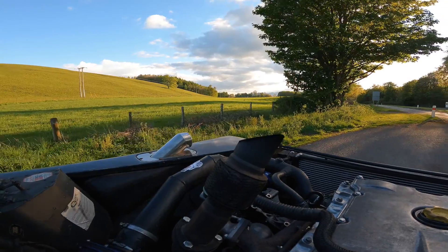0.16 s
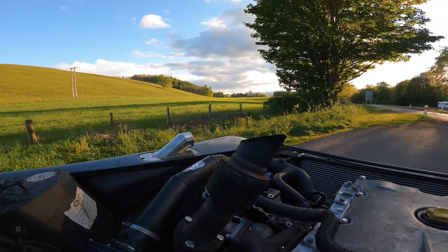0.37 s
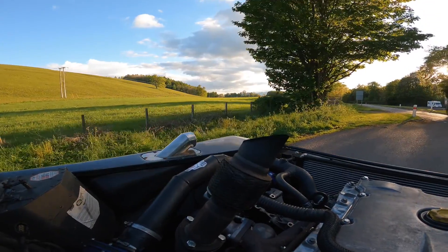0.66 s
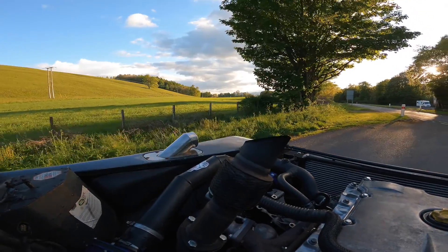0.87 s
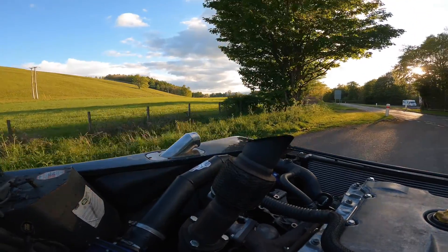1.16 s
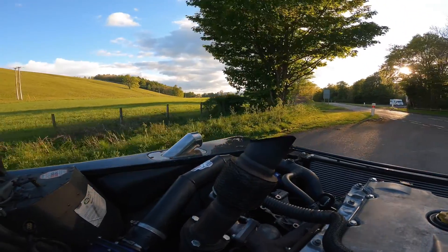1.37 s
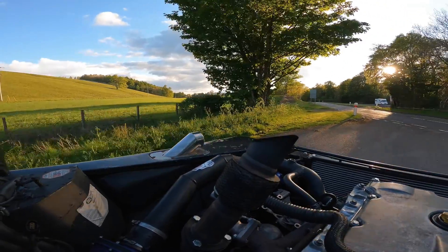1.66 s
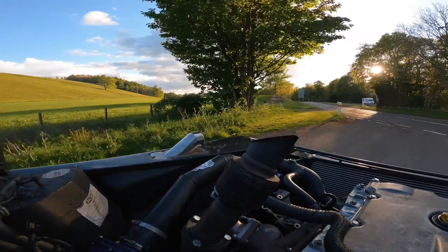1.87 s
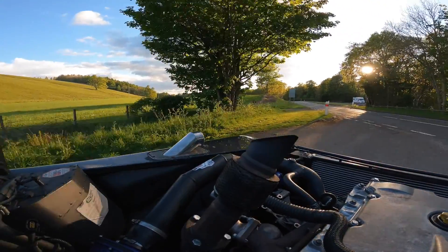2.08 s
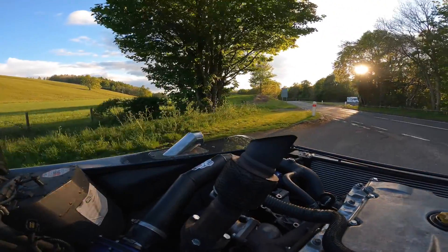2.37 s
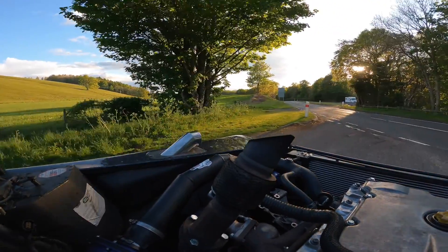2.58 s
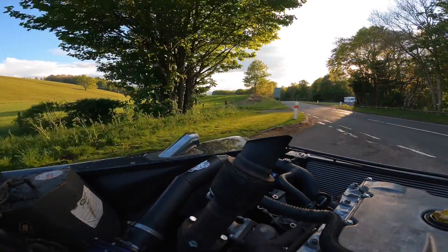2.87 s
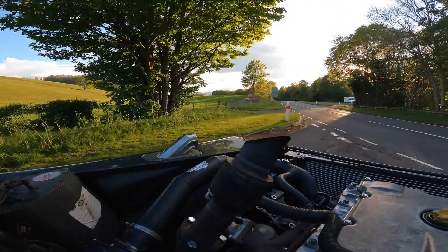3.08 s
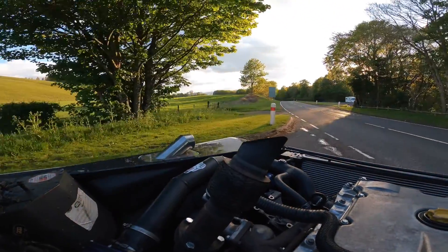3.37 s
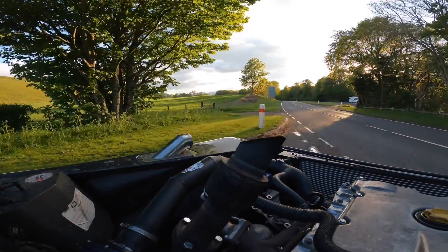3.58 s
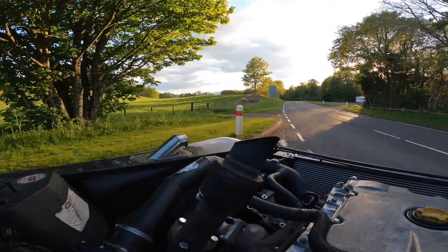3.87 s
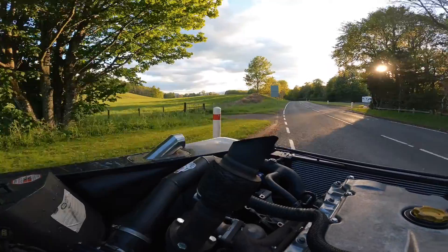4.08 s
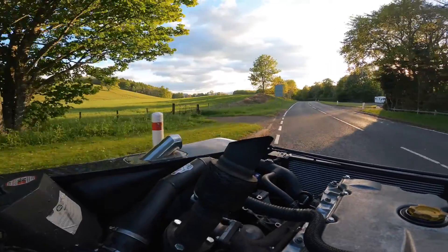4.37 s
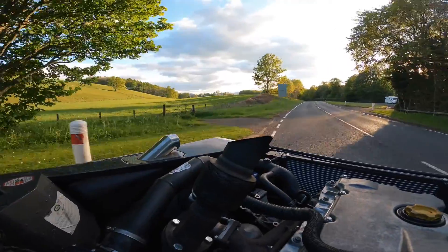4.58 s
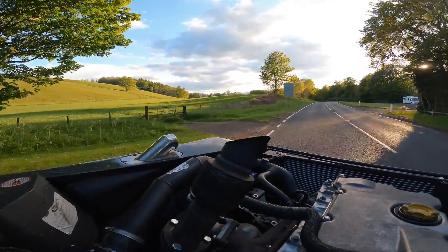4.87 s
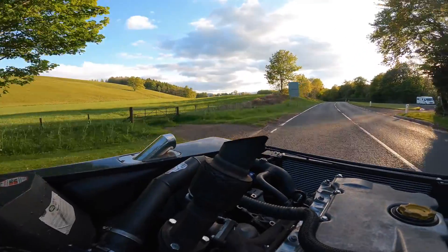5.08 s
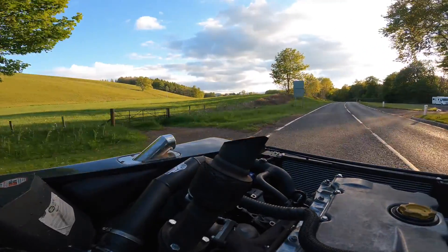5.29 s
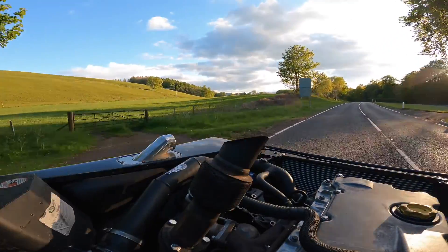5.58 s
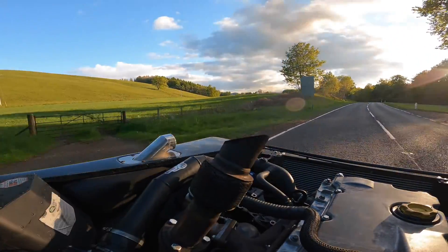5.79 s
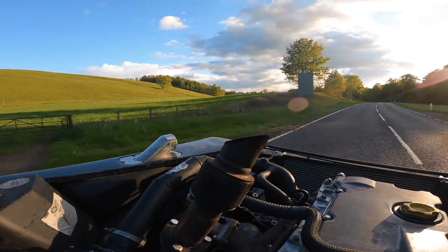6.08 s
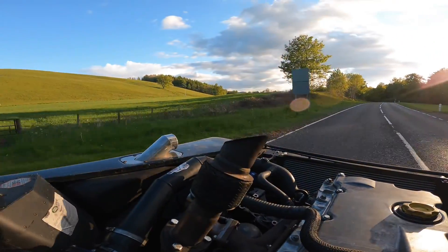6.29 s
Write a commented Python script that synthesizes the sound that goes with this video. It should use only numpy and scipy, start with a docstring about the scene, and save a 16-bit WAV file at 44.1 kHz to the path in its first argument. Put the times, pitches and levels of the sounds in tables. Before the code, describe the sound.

Heard over an open engine bay, a knocking diesel pulls away and climbs to high revs, intake roaring, turbo whistling, wind buffeting, then lifts off.

```python
"""Turbodiesel revving up to a lift-off

A five-cylinder turbodiesel pulls away from idle and revs up until the throttle shuts, heard over the open engine bay.
The intake booms and roars on multiples of the firing rate; each firing knocks the block and puffs hiss and ticking.
The turbo whistle, a tone bent and chopped by the pulses, climbs with boost and drops as the throttle shuts.
Wind, as filtered noise, buffets the two microphone ports more strongly as speed builds."""
import sys
import numpy as np
from scipy import signal
from scipy.fft import rfft, irfft
from scipy.io import wavfile
from scipy.ndimage import uniform_filter1d

SR = 44100
rng = np.random.default_rng(int(sys.argv[2]) if len(sys.argv) > 2 else 0)


def voltage_ratio(level):
    """Linear amplitude factor for a level in decibels (scalar or array-like)."""
    return 10 ** (np.asarray(level, float) / 20)


def store_pcm(level_fs):
    """Save levels as 16-bit WAV."""
    pcm = np.round(np.clip(level_fs, -1, 1) * 32767).astype(np.int16)
    wavfile.write(sys.argv[1], SR, np.atleast_2d(pcm).T)


N = 284445
T = np.arange(N) / SR

# Engine speed. Each row: time in seconds, firing rate in Hz.
FIRING_RATE = [(0.0, 38.72), (0.07, 38.11), (0.85, 37.16), (0.94, 39.98), (1.1, 43.23), (1.25, 43.79),
               (1.33, 46.05), (2.23, 66.13), (2.48, 71.01), (2.91, 78.32), (3.67, 89.72), (4.25, 101.08),
               (5.04, 117.95), (5.25, 124.31), (5.46, 128.1), (5.67, 136.19), (6.24, 155.3), (6.28, 151.41),
               (6.45, 147.58)]
# Intake pipe's answer to engine speed. Each row: firing rate in Hz, then the rms level in dB of the
# first, second and third multiple with the throttle open.
INTAKE_BOOM = [(36.8, -28, -15, -33), (43, -24, -14, -26), (50.6, -21.5, -14, -21.5),
               (57.7, -16, -16.5, -23), (64.4, -13, -21.5, -21), (68.5, -13, -25, -22),
               (75.9, -12, -21.5, -25), (81.3, -12.5, -19.5, -31), (97.86, -12, -16.5, -27.5),
               (113, -11, -20, -28.5), (129.4, -10, -23, -37), (156, -12, -21.5, -36)]
# Intake pipe as seen by upper multiples and uneven cylinders. Each row: frequency in Hz, gain in dB.
INTAKE_PIPE = [(40, -73), (100, -28.5), (150, -33), (190, -17.5), (225, -26), (265, -31), (310, -35),
               (400, -43), (520, -43), (900, -61.5), (2000, -110)]
# Strength of each cylinder against the others, one relative number per cylinder.
CYLINDER_SHARE = [0.94, -0.23, 0.23, -0.0096, -0.059]
# Intake roar. Each row: multiple of the firing rate, blur in Hz, rms level in dB at full revs.
ROAR_BANDS = [(6.0, 140, -32), (9.1, 150, -33.5)]
# Lines heard once the throttle shuts. Each row: multiple of the firing rate, mean peak level in dB.
OVERRUN_LINES = [(2.2, -32), (3.2, -32), (4.4, -37)]
# Block ringing, mostly higher once the gas in it is hot. Each row: frequency in Hz at idle,
# frequency in Hz under load, width in Hz, height in dB.
BLOCK_MODES = [(612, 640, 185, 11), (1120, 1220, 210, 5.5), (1590, 1630, 117, 10.5), (2070, 2150, 82, 9),
               (2540, 2300, 156, 9.5)]
# Ringing of injector pipes, drowned at speed. Each row: frequency in Hz, width in Hz, height in dB.
INJECTOR_PIPE_MODES = [(5240, 390, 13), (7450, 780, 8.5), (8850, 400, 3), (11900, 1200, 5)]
# Spectra of knock, hiss and ticking. Each row: frequency in Hz, relative level in dB.
KNOCK_SPECTRUM = [(200, -43.5), (320, -6), (450, -13), (950, -8), (1400, -4.5), (1850, -11), (2400, -15),
                  (3200, -14), (5000, -36.5), (9000, -86)]
HISS_SPECTRUM = [(900, -34.5), (2000, 2), (3200, -1), (4200, -2.5), (6000, -10), (10000, -26.5),
                 (14000, -50)]
TICK_SPECTRUM = [(3000, -40), (4500, -8.5), (6000, -0.5), (8000, -6), (10000, -8), (12500, -15),
                 (14000, -26), (15500, -54)]
# Level laws of the three clatters. Each holds: level in dB at idle, gain in dB under load,
# dB per octave of revs, change in dB as fuel is cut back, change in dB when coasting.
KNOCK_LAW = (-26, 4.5, -2, -.4, -3)
HISS_LAW = (-38.5, 5, 2.5, 1.5, -4)
TICK_LAW = (-39, 2, 4.5, -8, -1)
# Turbo. Each row: time in seconds, blade whistle in Hz, rms gain in dB.
TURBO_WHISTLE = [(0, 2780, -31), (.5, 2620, -30), (1.2, 2626, -30), (1.45, 3000, -37), (2, 4000, -42),
                 (2.2, 4300, -36), (2.38, 4600, -27.5), (2.5, 4850, -33), (2.65, 5270, -28.5),
                 (3, 5350, -23.5), (3.35, 5550, -24), (3.8, 6150, -31), (4.4, 6950, -30), (5, 7800, -32),
                 (5.55, 8860, -31.5), (5.8, 10300, -41), (6, 11850, -48), (6.17, 12700, -55),
                 (6.23, 12600, -48), (6.45, 10030, -53)]
# Sound of the bay unlike at the two sides. Each row: frequency in Hz, level in dB against the common part.
BAY_SCATTER = [(200, -35), (600, -22), (1400, -11.5), (3000, -10), (6500, -13.5), (9000, -11), (11000, -18),
               (12500, -3.5)]
# Wind strength. Each row: time in seconds, gain of the buffeting in dB.
WIND_GAIN = [(0, -59), (2, -41), (2.8, -35), (4, -38.5), (5, -32.5), (5.95, -28), (6.45, -26.5)]
# Wind spectra, shared by the ports and separate at each. Each row: frequency in Hz, relative level in dB.
SHARED_GUST = [(20, -11), (45, -9), (110, -6.5), (200, -11.5), (400, -10.5), (1000, -40), (4000, -87)]
PORT_FLUTTER = [(40, -30), (120, -32), (250, -12), (600, -17.5), (1200, -15), (3000, -54), (8000, -95)]
# Shading of the ports. Each row: frequency in Hz, left minus right in dB.
PORT_BALANCE = [(90, 0), (160, -.6), (280, -3), (550, -1.6), (1100, -1.4), (2200, -.5), (4500, -1.6),
                (8500, -.7), (12500, -2)]
# Delay between the ports. Each row: frequency in Hz, phase in radians by which the left port leads.
PORT_LEAD = [(100, -.04), (200, -.1), (500, -.05), (1200, -.1), (1750, -.35), (3100, -.5), (5900, -.1),
             (8000, -.05), (11200, 0), (12200, .3), (13000, 0)]

CYLINDERS = 5
CRANK_START = 1.585  # turns; one turn is one firing
IDLE_HZ = 37.5  # firing rate from which octaves of revs are counted
THROTTLE_S, LOAD_RISE_S = 0.76, 0.72  # pedal goes down; load builds over this time
GOVERNOR_S, GOVERNOR_FADE_S = 5.72, 0.4  # fuel is cut back near full revs
LIFT_S, SHUT_S = 6.22, 0.046  # lift-off; how long the throttle takes to shut
COAST_S = 0.17  # time for clatter and roar to change after the lift


def level(x, db):
    """Normalization: scales a signal to an rms level in dB."""
    return x * voltage_ratio(db) / np.sqrt(np.mean(x ** 2))


def curves(table):
    """Linear interpolation: joins the columns of a table over time."""
    s, *columns = np.transpose(table)
    return [np.interp(T, s, column) for column in columns]


def ramp(start_s, length_s):
    """Linear transition: rises from 0 to 1 and stays there."""
    return np.clip((T - start_s) / length_s, 0, 1)


def read(points, hz):
    """Logarithmic interpolation: reads a spectrum table on a log-frequency axis."""
    f, db = np.transpose(points)
    return np.interp(np.log(np.maximum(hz, 1)), np.log(f), db)


def colour(x, points, modes=()):
    """Minimum-phase filtering: a causal response is derived from a spectrum with resonances added."""
    hz = np.linspace(0, SR / 2, 4097)
    peaks_db = sum(height / (1 + (2 * (hz - f) / width) ** 2) for f, width, height in modes)
    db = read(points, hz) + peaks_db
    # folding the cepstrum onto positive time makes the filter causal
    cepstrum = irfft(np.log(voltage_ratio(db)))[:4096]
    cepstrum[1:] *= 2
    response = irfft(np.exp(rfft(cepstrum, 8192)))[:4096]
    return signal.oaconvolve(x, response)[:N]


def walk(rate):
    """Slow random fluctuation: held noise at a rate in Hz, smoothed twice, with a spread of 1."""
    k = int(SR / rate)
    held = np.repeat(rng.standard_normal(N // k + 1), k)
    slow = uniform_filter1d(uniform_filter1d(held, k), k)[:N]
    return slow / slow.std()


def puff(turns, sharp, scatter_db):
    """Periodic modulation: one swell of level per firing, each of its own random size."""
    size = voltage_ratio(scatter_db * rng.standard_normal(N // 100))
    swell = np.exp(sharp * (np.cos(2 * np.pi * turns) - 1))
    return size[(turns + 0.5).astype(int)] * swell


def boom(hz, turns):
    """Harmonic excitation of a pipe: multiples of the firing rate, with faint lines from uneven cylinders."""
    def wave(k, db, lead):
        return np.sqrt(2) * voltage_ratio(db) * np.cos(2 * np.pi * k * turns + lead)

    rate, *multiples = np.transpose(INTAKE_BOOM)
    shut = ramp(LIFT_S - SHUT_S / 2, SHUT_S)
    shut_db = (-0.5, -32, -2)  # change of the three multiples as the throttle shuts
    first_db, second_db, third_db = (np.interp(hz, rate, db) + change * shut
                                     for db, change in zip(multiples, shut_db))
    # the second multiple turns over as it passes the dip of the intake pipe, and again near full revs
    at_dip = 2.3 / (1 + np.exp((72 - hz) / 5))
    near_full_revs = 2.2 / (1 + np.exp((134 - hz) / 6))
    turn_over = 0.4 + at_dip + near_full_revs
    out = wave(1, first_db + 0.11 * walk(4.0), 0)
    out += wave(2, second_db + 0.5 * walk(12), turn_over)
    out += wave(3, third_db + 0.23 * walk(8.2), 2.3 + turn_over / 2)

    # each further multiple is weaker, the more so at high revs
    step_db = -3 - 4.5 * np.log2(hz / IDLE_HZ)
    for k in range(4, 8):
        upper_db = read(INTAKE_PIPE, k * hz) - 1.3 + step_db * (k - 4)
        out += wave(k, upper_db + 1.25 * walk(10.1), 1.78)

    fired = np.diff(turns.astype(int), prepend=int(turns[0]))
    share = np.array(CYLINDER_SHARE) - np.mean(CYLINDER_SHARE)
    chance = (7 / hz) * rng.standard_normal(N)
    uneven = fired * (share[turns.astype(int) % CYLINDERS] + chance)
    # faster firings feed the pipe more often but each one less
    return out + level(colour(uneven, INTAKE_PIPE) * (40 / hz) ** 0.5, -30)


def roar(turns, fast):
    """Narrow-band noise: random quadrature modulation blurs multiples of the firing rate into bands."""
    swell = fast ** 2 * (1 - ramp(LIFT_S, COAST_S))
    out = 0
    for k, blur, db in ROAR_BANDS:
        phase = 2 * np.pi * k * turns
        band = walk(blur) * np.cos(phase) + walk(blur) * np.sin(phase)
        out = out + voltage_ratio(db) * swell * band
    return out


def overrun(turns):
    """Inharmonic lines: with the throttle shut, tones between the firing multiples sing out."""
    lines = sum(voltage_ratio(db + 1.2 * walk(23)) * np.cos(2 * np.pi * k * turns) for k, db in OVERRUN_LINES)
    return ramp(LIFT_S, SHUT_S) * lines


def knock(hz, turns):
    """Impulsive excitation: decaying rattle, partly repeated per cylinder, over steady valve-gear clatter."""
    common = 0.5 * rng.standard_normal(SR // 20)
    habit = 0.6 * rng.standard_normal((CYLINDERS, SR // 20)) + common
    firing = turns.astype(int)
    since = (turns % 1 / hz * SR).astype(int)  # samples since the firing
    rattle = habit[firing % CYLINDERS, since] + rng.standard_normal(N)
    size = voltage_ratio(rng.standard_normal(N // 100))[firing]  # spread of 1 dB
    rise = 1 - np.exp(-since / SR / 0.0017)  # time constants in seconds
    decay = np.exp(-since / SR / 0.0048)
    steady = voltage_ratio(1.14 * walk(25.37)) * rng.standard_normal(N)
    return size * rise * decay * rattle + 0.21 * steady


def hiss(turns, depth, sharp):
    """Amplitude-modulated noise: swells once a firing over a steady floor."""
    return (puff(turns, sharp, 1.8) * depth + 0.26) * rng.standard_normal(N)


def ring(x, fast, points, idle_modes, loaded_modes):
    """Modal filtering: crossfades a clatter from its idle resonances to those under load."""
    idle = level(colour(x, points, idle_modes), 0)
    loaded = level(colour(x, points, loaded_modes), 0)
    return level((1 - fast) * idle + fast * loaded, 0)


def clatter_db(hz, idle_db, load_db, octave_db, governed_db, coasting_db):
    """Superposed level laws: load, revs, governor and lift-off each add their decibels."""
    return (idle_db + load_db * ramp(THROTTLE_S, LOAD_RISE_S)
            + octave_db * np.log2(hz / IDLE_HZ)
            + governed_db * ramp(GOVERNOR_S, GOVERNOR_FADE_S)
            + coasting_db * ramp(LIFT_S, COAST_S))


def turbo(turns):
    """Frequency and amplitude modulation: pulses bend and chop the blade whistle into parallel lines."""
    hz, db = curves(TURBO_WHISTLE)
    # the pulses bend it most as it passes 9 kHz, less below and above
    pulse_bend = 0.055 * np.minimum(hz / 9000, 9000 / hz) ** 1.6 * np.sin(2 * np.pi * turns + 0.2)
    bend = 1 + pulse_bend + 0.003 * walk(40) + 0.004 * walk(900)
    spin = 2 * np.pi * np.cumsum(hz * bend) / SR
    octave = voltage_ratio(-14 - (hz / 3600) ** 4) * np.cos(2 * spin)
    # breath blurs the tone
    breath = walk(700) * np.cos(spin) + walk(700) * np.sin(spin)
    tone = np.cos(spin) + octave + (0.25 + np.abs(hz - 5500) / 5500) * breath
    chop = puff(turns, 1.3, 1.8) + 0.2 + (hz / 12000) ** 2
    return voltage_ratio(db) * level(tone * chop, 0)


def wind():
    """Turbulent pressure: filtered noise with gusts shared by both ports and flutter separate at each."""
    both, left, right = (voltage_ratio(1.8 * walk(14)) * rng.standard_normal(N) for _ in range(3))
    apart = np.array([level(colour(x, PORT_FLUTTER), -4) for x in (left, right)])
    return voltage_ratio(curves(WIND_GAIN)[0]) * (level(colour(both, SHARED_GUST), 0) + apart)


def scene():
    """Superposition: engine layers share one firing phase; bay scatter and wind add differences at the sides."""
    hz, = curves(FIRING_RATE)
    knock_db, hiss_db, tick_db = (clatter_db(hz, *law) for law in (KNOCK_LAW, HISS_LAW, TICK_LAW))
    turns = CRANK_START + np.cumsum(hz) / SR
    # the boom travels down the pipe and lags the bare engine by some milliseconds
    puffs = turns - 0.84 + 0.0053 * hz
    knocks = turns - 0.86 + 0.009 * hz
    # faster firings run together, so the swells flatten with speed
    depth = (40 / hz) ** 1.12
    fast = np.clip((hz - 60) / 95, 0, 1)
    idle, loaded = ([(mode[k], *mode[2:]) for mode in BLOCK_MODES] for k in (0, 1))

    def rattles():
        """Independent noise sources: knock, hiss, ticking and whistle, drawn afresh at each call."""
        knocking = ring(knock(hz, knocks), fast, KNOCK_SPECTRUM, idle, loaded)
        hissing = level(colour(hiss(puffs, depth, 1.4), HISS_SPECTRUM), 0)
        ticking = ring(hiss(puffs, depth, 2.4), fast ** 0.9, TICK_SPECTRUM, INJECTOR_PIPE_MODES, ())
        clatter = voltage_ratio(knock_db) * knocking + voltage_ratio(hiss_db) * hissing + voltage_ratio(tick_db) * ticking
        return clatter + turbo(puffs - 0.1)

    direct = boom(hz, turns) + roar(turns, fast) + overrun(turns) + rattles()
    scattered = colour(rattles(), BAY_SCATTER)
    # opposite signs make the scattered part unlike at the two sides
    return direct + scattered * np.array([[1], [-1]]) + wind()


def top_cut(x):
    """Nothing passes above the cut-off."""
    return signal.sosfilt(signal.butter(12, 14950, fs=SR, output="sos"), x)


def record(dry):
    """Interaural-style differences: the two ports shade and delay the sound by frequency."""
    hz = np.arange(N // 2 + 1) * SR / N
    # each port takes half of the difference, in opposite directions
    half = voltage_ratio(read(PORT_BALANCE, hz) / 2) * np.exp(0.5j * read(PORT_LEAD, hz))
    ports = irfft(rfft(dry) * np.array([half, 1 / half]), N)
    return top_cut(ports)


dry = scene()
out = record(dry)
store_pcm(out)
```